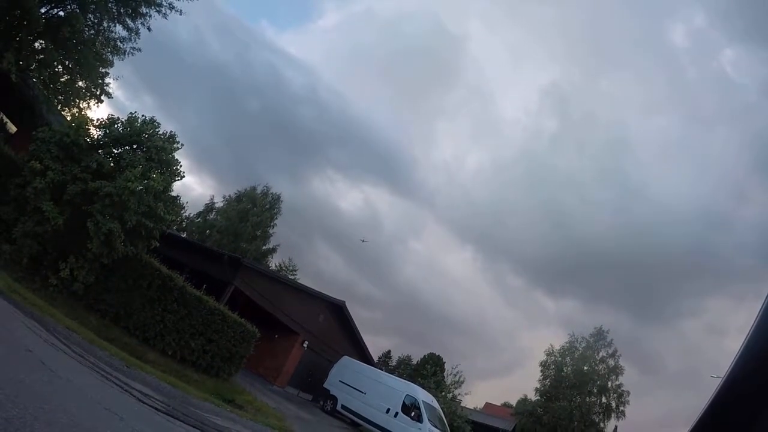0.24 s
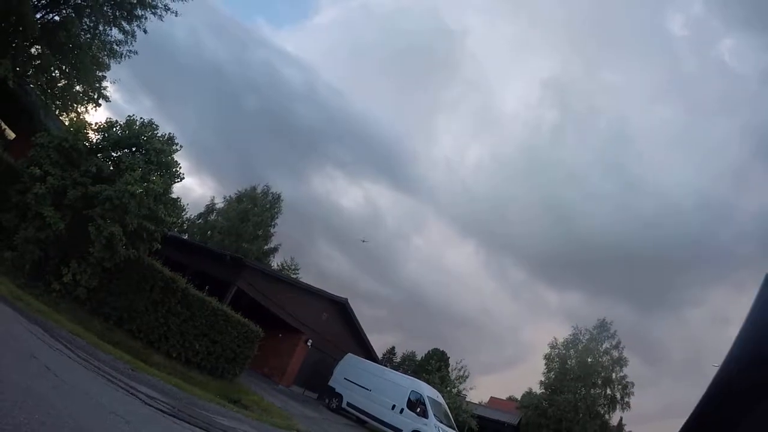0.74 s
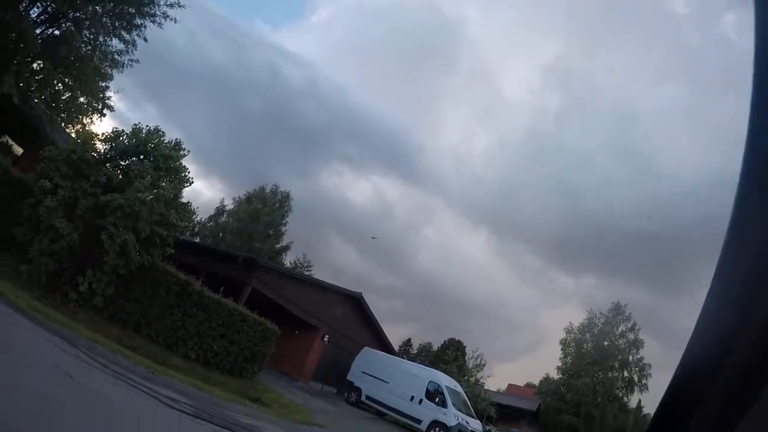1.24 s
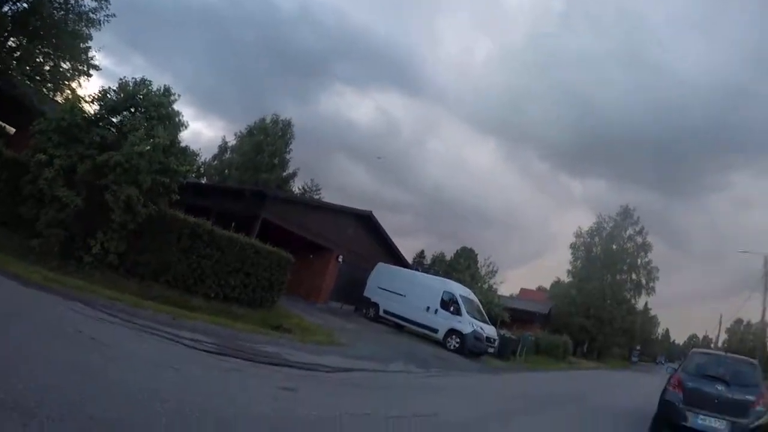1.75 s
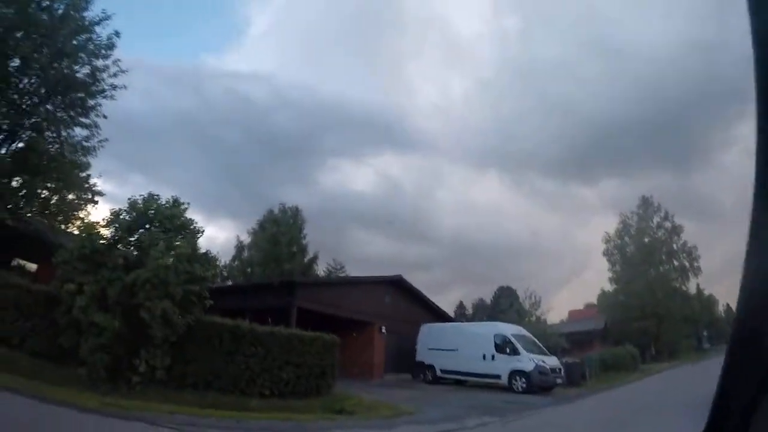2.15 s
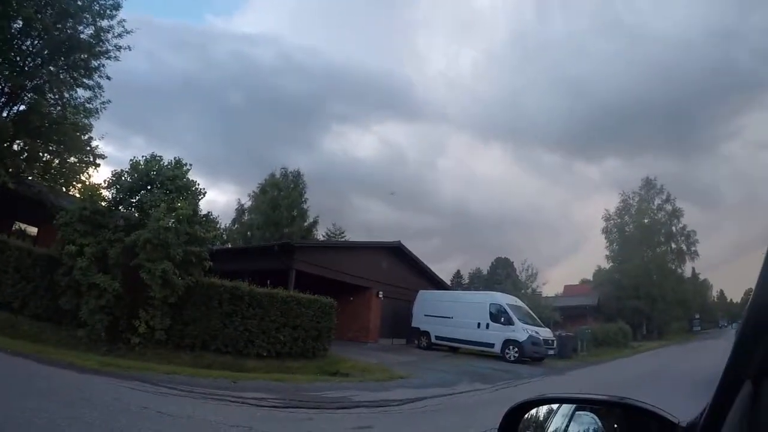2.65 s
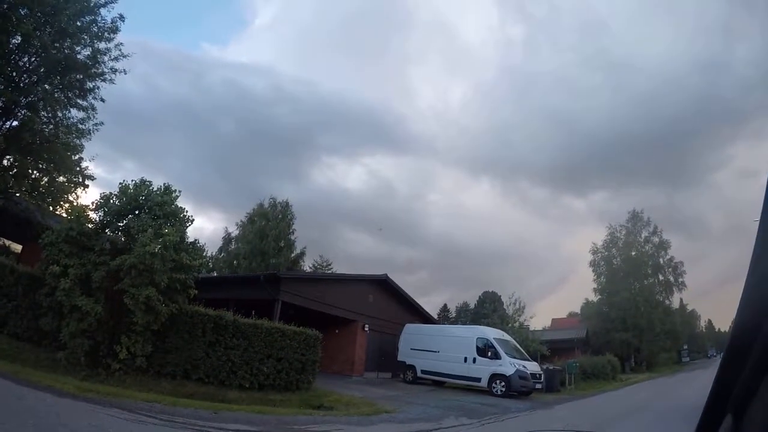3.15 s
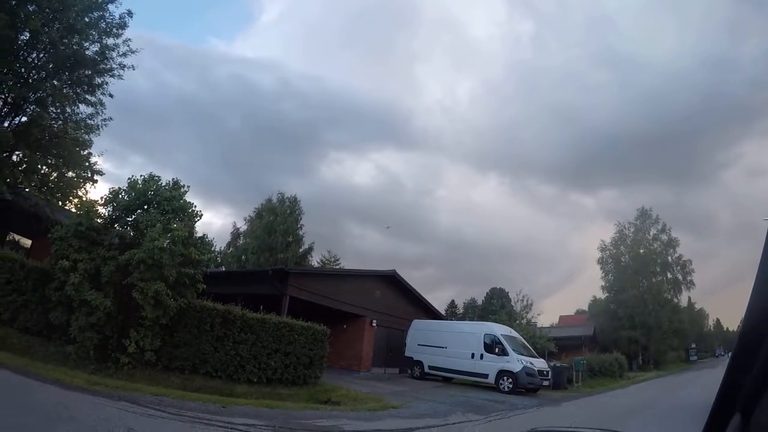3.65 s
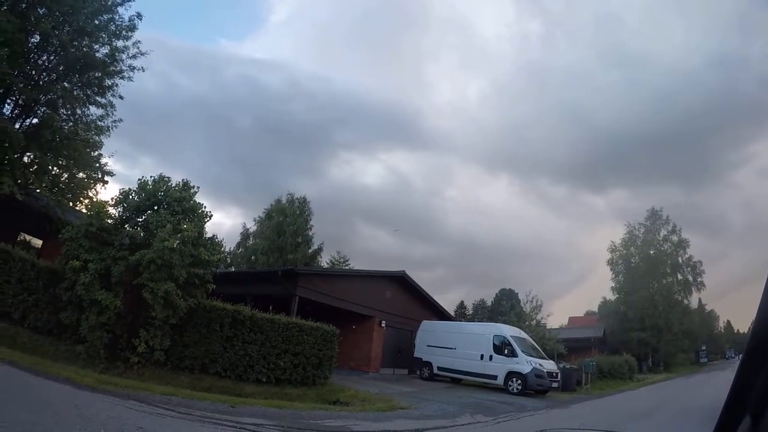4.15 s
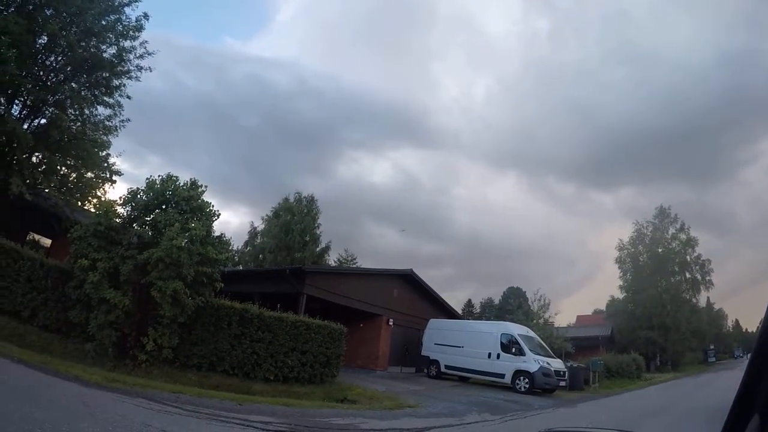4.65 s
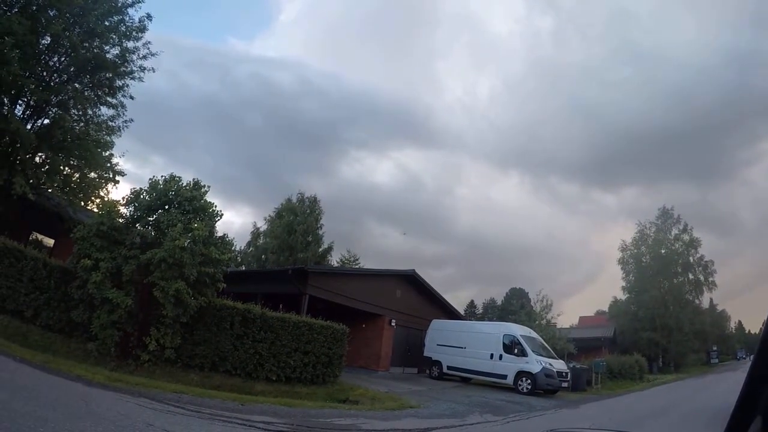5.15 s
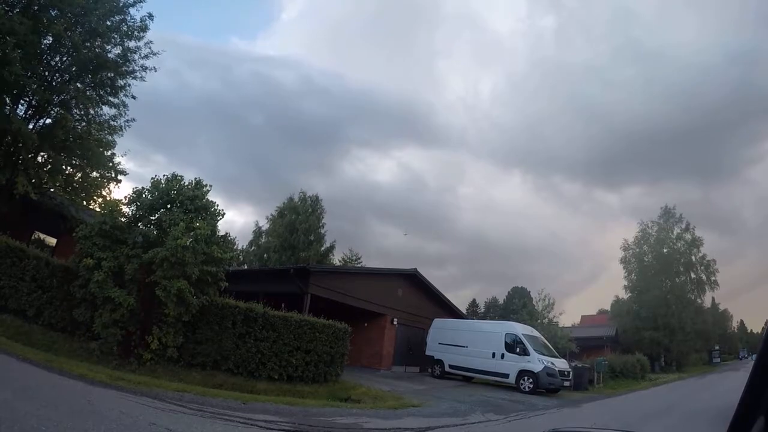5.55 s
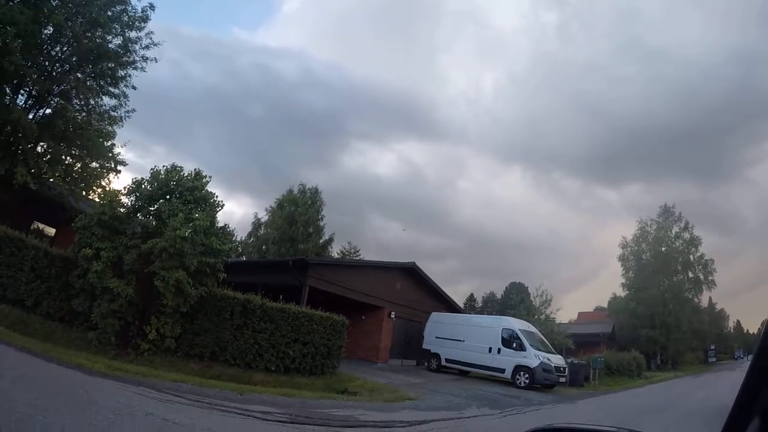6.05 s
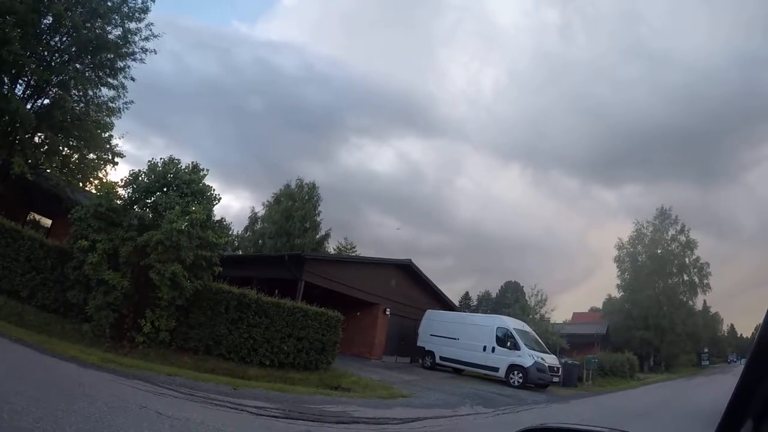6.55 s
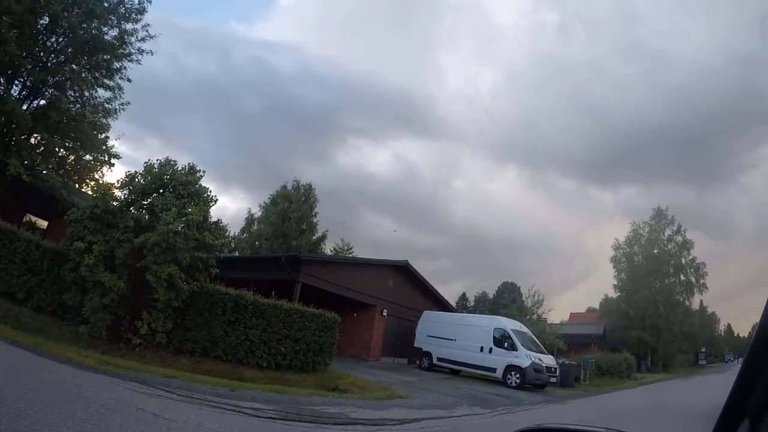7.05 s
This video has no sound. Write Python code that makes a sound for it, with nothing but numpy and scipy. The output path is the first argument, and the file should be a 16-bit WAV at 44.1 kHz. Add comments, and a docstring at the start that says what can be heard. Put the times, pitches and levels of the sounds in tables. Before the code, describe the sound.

Heavy, very low rolling noise dominates, pulsing irregularly in the car body, droning and humming. Over it lies a quiet mid-range roar with a phasey, slowly rising hollow colour and a faint whine that comes and goes. Close stereo microphone in the hand: small ticks and rubbing, then a rough grip slip, a knock, more rubbing, a brief grip creak past four seconds, and a crack with a short thud past six. Slight hiss.

```python
"""In a quiet street, at the side window of a car with worn wheel bearings.
A deep rumble of filtered noise booms in the body, in uneven surges, with a hum and a growl over it.
A softer roar of noise swells above it, coloured by a reflection whose path shortens overall.
The hand-held microphone is turned: noise bursts rustle, resonances tick, the grip squeaks, air puffs.
The recorder limits the bass."""
import sys
import numpy as np
from scipy import signal
from scipy.fft import rfft, irfft
from scipy.io import wavfile
from scipy.ndimage import uniform_filter1d, minimum_filter1d

SR = 44100
rng = np.random.default_rng(int(sys.argv[2]) if len(sys.argv) > 2 else 0)


def store_pcm(level_fs):
    """Save levels as 16-bit WAV."""
    pcm = np.round(np.clip(level_fs, -1, 1) * 32767).astype(np.int16)
    wavfile.write(sys.argv[1], SR, np.atleast_2d(pcm).T)


N = 321706
TIME = np.arange(N) / SR  # s
FREQS = np.maximum(np.arange(N // 2 + 1) * SR / N, 1)  # Hz, kept above zero for the log axis


def from_db(db):
    """Decibels to gain."""
    return 10 ** (np.asarray(db) / 20)


def rms_one(x):
    """Scale to unit power."""
    return x / np.sqrt(np.mean(x ** 2) + 1e-20)


def in_time(rows):
    """Each column of an automation curve at every sample."""
    s, *columns = np.transpose(rows)
    return [np.interp(TIME, s, c) for c in columns]


def over_hz(points):
    """A table read at every frequency, on a log axis."""
    hz, value = np.transpose(points)
    return np.interp(np.log(FREQS), np.log(hz), value)


def noise(spectrum, channels=1):
    """Unrelated noises of one colour, falling steeply past its last point; rms 1."""
    top_hz = spectrum[-1][0]
    gain = from_db(over_hz(spectrum)) * np.minimum(1, top_hz / FREQS) ** 8
    white = rng.standard_normal((channels, N))
    return rms_one(irfft(rfft(white) * gain, N))


def smooth(x, seconds):
    """Triangular running mean."""
    size = max(int(seconds * SR), 1)
    return uniform_filter1d(uniform_filter1d(x, size), size)


def flutter(seconds):
    """Slow random movement with rms 1."""
    return rms_one(smooth(rng.standard_normal(N), seconds))


def steady(x, seconds):
    """Even out the slow swells of a noise."""
    return x / np.sqrt(smooth(x ** 2, seconds) + 1e-9)


def below(x, edge_hz):
    """The part of a sound under a steep crossover."""
    return irfft(rfft(x) / (1 + (FREQS / edge_hz) ** 8), N)


def resonate(x, modes):
    """Parallel resonances (Hz, width Hz, dB) with alternating signs."""
    out = 0
    for k, (hz, width, db) in enumerate(modes):
        r = np.exp(-np.pi * abs(width) / SR)
        poles = [1, -2 * r * np.cos(2 * np.pi * hz / SR), r * r]
        gain = (-1) ** k * from_db(db) * (1 - r * r) / 2
        out = out + gain * signal.lfilter([1, 0, -1], poles, x + 1e-18)
    return out


def delayed(x, ms):
    """A sound late by a fixed or moving delay."""
    return np.interp(TIME - ms / 1000, TIME, x)


def pan(db):
    """Left and right gains for a level difference."""
    return from_db(np.array([[db], [-db]]) / 2)


def swell(at_s, length_s):
    """A bell-shaped rise and fall."""
    return np.exp(-np.minimum(((TIME - at_s) / length_s) ** 2 / 2, 50))


def gesture(at_s, hold_s, attack_s, release_s):
    """Exponential attack, level hold, exponential release."""
    early = np.maximum(at_s - TIME, 0)
    late = np.maximum(TIME - at_s - hold_s, 0)
    return np.exp(-np.minimum(early / attack_s + late / release_s, 50))


def tone(hz):
    """A sine that follows a moving pitch."""
    return np.sin(2 * np.pi * np.cumsum(hz) / SR)


# colour of the microphone hiss: (frequency [Hz], relative density [dB per Hz])
HISS_COLOUR = [(500, 16), (4300, -4.5), (5500, -3.5), (6100, -0.5), (6800, -1.5), (8200, -3.5),
               (9800, -2.5), (11000, -7.5), (12500, -12), (14500, -22)]


def hiss(level_db=-51.5):
    """The microphone's own noise, unrelated at its two ports."""
    return from_db(level_db) * noise(HISS_COLOUR, channels=2)


# cracks of the housing: (time [s], level before trim [dB], decay [s], left over right [dB])
TICK_EVENTS = [(0.773, -54, 0.0027, 5), (0.786, -52, .003, 0), (0.971, -59, .003, -7),
               (2.273, -57.5, 0.012, -4), (2.3316, -60, .006, 2), (3.049, -61, .008, -3),
               (6.2392, -57, .002, -3), (6.279, -42.5, 0.0014, 2), (6.2806, -39, .002, -1)]
# resonances of the plastic housing: (frequency [Hz], width [Hz], level [dB])
HOUSING_MODES = [(1100, 900, 14), (1880, 750, 13), (2770, 900, 0.5), (4600, 1200, -3.5), (5430, 340, -3),
                 (5980, 450, 6), (7650, 520, -4), (9700, 2000, -12.5)]


def ticks(trim_db=14.0):
    """Short cracks, decaying bursts of noise, ring the plastic housing."""
    force = np.zeros((2, N))
    age = TIME[:SR // 20]
    for s, db, decay, pan_db in TICK_EVENTS:
        start = int(s * SR)
        burst = np.exp(-age / decay) * rng.standard_normal((2, len(age)))
        force[:, start:start + len(age)] += from_db(db + trim_db) * pan(pan_db) * burst
    return resonate(force, HOUSING_MODES)


# chirps of the squeaking grip: (time [s], bell width [s], mean pitch [Hz], level [dB])
GRIP_CHIRPS = [(4.346, .008, 3900, -63), (4.362, .007, 5070, -61), (4.377, 0.007, 4730, -62),
               (4.637, .011, 4650, -67), (4.7, .015, 4740, -69)]
# partials of the creak: (multiple of the slip rate, level [dB])
CREAK_PARTIALS = [(6, -67), (7, -61), (8, -59), (9, -65), (13, -66), (15, -69)]


def squeak(creak_at_s=4.396, creak_s=0.021, slip_hz=482, rise_hz_per_s=200,
           waver=.006, waver_s=0.00195, haze_db=-58, pan_db=-4.0):
    """The grip sticks and slips: thin chirps and a creak of rising slip rate, in a haze of friction."""
    from_middle = np.clip(TIME - creak_at_s, -3 * creak_s, 3 * creak_s)
    slips = slip_hz + rise_hz_per_s * from_middle
    unsteady = 1 + waver * flutter(waver_s)
    partials = sum(from_db(db) * tone(k * slips * unsteady) for k, db in CREAK_PARTIALS)
    haze = from_db(haze_db) * noise(RUB_SPECTRUM, channels=2)
    creak = swell(creak_at_s, creak_s) * (partials + haze)
    chirps = sum(from_db(db) * swell(s, length) * tone(hz * unsteady)
                 for s, length, hz, db in GRIP_CHIRPS)
    return (creak + chirps) * pan(pan_db)


# dull knocks: (time [s], bell width [s], pitch [Hz], level [dB])
BODY_KNOCKS = [(2.165, 0.0021, 223, -13), (6.282, 0.00096, 330, -28)]


def bump():
    """Soft, dull knocks on the body of the microphone: sines under a brief bell."""
    return sum(from_db(db) * swell(s, length) * np.sin(2 * np.pi * hz * (TIME - s))
               for s, length, hz, db in BODY_KNOCKS)


# jolts of the grip: (time [s], level [dB], attack and decay [s])
GRIP_JOLTS = [(1.802, -14, .005), (1.849, -15, .011), (6.2805, -10, .016)]


def jolts(pitch_hz=58):
    """A jolt rocks the microphone in its mount: a short, deep thud, opposite at the two ports."""
    side = 0
    for s, db, decay in GRIP_JOLTS:
        age = np.maximum(TIME - s, 0)
        thud = gesture(s, 0, decay, decay) * np.sin(2 * np.pi * pitch_hz * age)
        side = side + from_db(db) * thud
    return np.array([side, -side])


# puffs on the ports: (time [s], bell width [s], level [dB], centre [Hz], width [Hz])
AIR_PUFFS = [(0.782, 0.011, -32, 550, 550), (1.738, 0.018, -31, 880, 400), (1.828, 0.013, -21, 950, 280),
             (2.165, 0.0085, -29, 258, 261), (2.259, 0.015, -30, 550, 550), (6.284, 0.0017, -27, 900, 800)]
# colour of the moving air: (frequency [Hz], relative density [dB per Hz])
AIR_COLOUR = [(100, 2), (220, 12), (1000, -6), (1500, -8), (2200, -12)]


def puffs(stroke_db=12.0, stroke_hz=300):
    """Air buffets the moving microphone, also under each stroke, in opposite senses at its ports."""
    air = noise(AIR_COLOUR)[0]
    side = from_db(stroke_db) * hand_pressure() * rms_one(resonate(air, [(stroke_hz, stroke_hz, 0)]))
    for s, length, db, hz, width in AIR_PUFFS:
        side = side + from_db(db) * swell(s, length) * rms_one(resonate(air, [(hz, width, 0)]))
    return np.array([side, -side])


# strokes of the hand: (start [s], hold [s], level [dB], thin rustle against that level [dB])
HAND_STROKES = [(0.778, .02, -56, -14), (0.97, .015, -55.5, -18), (1.07, .065, -64.5, 0),
                (1.41, 0.19, -57, -8.5), (1.665, 0.076, -55.5, -8), (1.73, 0.015, -48, -18),
                (1.887, 0.077, -56.5, -11), (2.336, .025, -53, -11), (2.445, 0.12, -62, -4)]
STROKE_ATTACK_S, STROKE_RELEASE_S = 0.024, 0.042  # time constants of every stroke


def hand_pressure():
    """All strokes of the hand over the housing as one gain."""
    return sum(from_db(db) * gesture(s, hold, STROKE_ATTACK_S, STROKE_RELEASE_S)
               for s, hold, db, _ in HAND_STROKES)


# colour of the rubbing: (frequency [Hz], relative density [dB per Hz])
RUB_SPECTRUM = [(800, -11), (1800, 8.5), (3000, -9), (4400, -1), (5200, -2.5), (6100, -3), (7800, -6.5),
                (10000, -13), (13000, -26)]
# colour of the slip: (frequency [Hz], relative density [dB per Hz])
SCUFF_SPECTRUM = [(400, 11), (1150, -11), (1550, 8), (1900, 7.5), (2900, -1), (3500, -2.5), (3900, 2.5),
                  (4400, -5.5), (6100, -0.5), (7800, -16.5), (10300, -15), (13500, -30)]
# the grip slips once
SCUFF_AT_S, SCUFF_HOLD_S, SCUFF_DB = 1.8135, 0.024, -28.7
SCUFF_ATTACK_S, SCUFF_RELEASE_S = 0.0095, 0.008
RUSTLE_HZ, RUSTLE_WIDTH_HZ = 5860, 990  # band of the thin rustle


def handling(grain_db=2.0, brush_db=0.9, brush_s=0.013, scuff_grain_db=2.0, slip_s=0.00098,
             body_lag_ms=4.4, body_hz=2800, width=.85):
    """Skin drags in tiny slips, partly unlike at each port; the hard scuff's body trails its hiss."""
    band = [(RUSTLE_HZ, RUSTLE_WIDTH_HZ, 0)]
    lightness = sum(from_db(db + rustle_db) * gesture(s, hold, STROKE_ATTACK_S, STROKE_RELEASE_S)
                    for s, hold, db, rustle_db in HAND_STROKES)
    white = rng.standard_normal((2, N))
    rustle = lightness * rms_one(resonate(resonate(white, band), band))
    drag = hand_pressure() * noise(RUB_SPECTRUM, channels=2)
    grain = from_db(grain_db * flutter(0.0016) + brush_db * flutter(brush_s))
    rub = (drag + rustle) * grain

    slip = gesture(SCUFF_AT_S, SCUFF_HOLD_S, SCUFF_ATTACK_S, SCUFF_RELEASE_S)
    scuff = from_db(SCUFF_DB) * slip * noise(SCUFF_SPECTRUM, channels=2)
    body = below(scuff, body_hz)
    late_body = np.array([delayed(port, body_lag_ms) for port in body])
    scuff = scuff - body + late_body
    mid, side = rub + scuff * from_db(scuff_grain_db * flutter(slip_s))
    return np.array([mid + width * side, mid - width * side])


# whine against the roar: (time [s], level [dB])
WHINE_CURVE = [(0, -34), (.85, -6.5), (1.4, -33), (2.1, -11.5), (2.5, -26.5), (3.05, -11), (3.7, -24),
               (5.2, -18.5), (7.25, -18)]


def whine(pitch_hz=1630, width_hz=45):
    """A narrow resonance, excited by noise, sings faintly in the rush, coming and going."""
    mode = [(pitch_hz, width_hz, 0)]
    level = in_time(ROAR_CURVE)[0] + in_time(WHINE_CURVE)[0]
    return from_db(level) * rms_one(resonate(resonate(rng.standard_normal(N), mode), mode))


# hollow ring against the roar: (time [s], level [dB])
HOLLOW_CURVE = [(0, -13), (1.05, -11), (1.4, -9), (2.1, -7.5), (2.45, -26), (3.1, -14.5), (4.2, -26),
                (7.25, -39)]


def hollow(ring_s=0.0036, order=3):
    """The third tooth of the reflection's comb stands out of the rush, glides up overall and fades."""
    hz = order * 1000 / in_time(REFLECTION_PATH)[0]
    level = in_time(ROAR_CURVE)[0] + in_time(HOLLOW_CURVE)[0]
    phase = 2 * np.pi * np.cumsum(hz) / SR
    ring = flutter(ring_s) * np.cos(phase) + flutter(ring_s) * np.sin(phase)
    return from_db(level) * rms_one(ring)


# force of the roar, before trims: (time [s], level [dB])
ROAR_CURVE = [(0, -36), (0.3, -41), (0.63, -43), (0.93, -41), (1.15, -43), (1.45, -36), (2.05, -37.5),
              (2.45, -40), (2.82, -40.5), (3.02, -35), (3.4, -36.5), (3.69, -36.5), (3.92, -40),
              (4.55, -42.3), (4.9, -40.3), (5.25, -40), (5.5, -41), (5.9, -45), (7.25, -44)]
# upper part of the roar against the lower, before trims: (time [s], level [dB])
BRIGHTNESS_CURVE = [(0, -7.5), (1.1, -7.5), (1.45, -12.5), (2.0, -10.5), (2.7, -11), (2.9, -9.5),
                    (3.1, -7.5), (3.7, -11.5), (5.3, -9.5), (7.25, -11.5)]
# colour of the roar: (frequency [Hz], relative density [dB per Hz])
ROAR_COLOUR = [(150, -2), (330, -1.5), (430, 5.5), (540, 1), (720, 0.5), (930, -3.5), (1250, -3.5),
               (1480, -8), (1720, -9), (2000, -14), (2700, -20), (3300, -22.5), (4400, -33.5),
               (8000, -62.5)]
# moving reflection: (time [s], delay [ms], strength [0-1])
REFLECTION_PATH = [(0, 3.37, .5), (1.0, 3.26, 0.5), (1.55, 3.23, 0.8), (1.85, 3.34, 0.4),
                   (2.15, 3.02, 0.48), (3, 2.95, 0.62), (3.6, 2.78, 0.51), (5, 2.64, 0.4),
                   (7.2, 2.43, 0.42)]
# fixed reflections off the door and mirror: (delay [ms], strength [0-1])
DOOR_MIRROR_ECHOES = [(1.23, .1), (1.8, .13)]
# left-right likeness of the roar, limited in use: (frequency [Hz], likeness [up to 1])
ROAR_LIKENESS = [(200, 0.59), (450, 0.84), (700, 0.6), (1100, 0.41), (1600, 0.48), (2400, 0.4), (3300, 1),
                 (5000, .5)]
REFLECTION_DULL_HZ, REFLECTION_TREBLE = 1680, 0.36  # above this only a share comes back


def roar(low_db=0.15, high_db=-0.5, split_hz=1350, flutter_db=0.83, pan_db=-0.7):
    """A wide rush meets its reflections; the moving one, a little dull, sweeps a comb upwards overall."""
    level, = in_time(ROAR_CURVE)
    upper = level + in_time(BRIGHTNESS_CURVE)[0]
    delay_ms, strength = in_time(REFLECTION_PATH)
    direct, diffuse = noise(ROAR_COLOUR, channels=2)
    dull = below(direct, REFLECTION_DULL_HZ)
    dulled = REFLECTION_TREBLE * direct + (1 - REFLECTION_TREBLE) * dull
    moving = np.clip(strength, 0, 1) * delayed(dulled, delay_ms)
    near = sum(g * delayed(direct, ms) for ms, g in DOOR_MIRROR_ECHOES)
    heard = direct + moving + near

    # the side part grows where the two channels are less alike
    alike = np.clip(over_hz(ROAR_LIKENESS), -.9, .99)
    spread = irfft(rfft(diffuse) * np.sqrt((1 - alike) / (1 + alike)), N)
    both = np.array([heard, spread])
    low = below(both, split_hz)
    high = both - low
    low = low / np.std(low[0]) * from_db(level + low_db)
    high = high / np.std(high[0]) * from_db(upper + high_db)
    mid, side = low + high
    return np.array([mid + side, mid - side]) * from_db(flutter_db * flutter(0.02)) * pan(pan_db)


# surges of the body boom, before trim: (time [s], level [dB])
BOOM_CURVE = [(0, -10), (.54, -13), (.72, -11), (.84, -19), (1.0, -8.5), (1.11, -20.5), (1.21, -6),
              (1.33, -20.5), (1.48, -9.5), (1.78, -10.5), (2.03, -14.5), (2.5, -14), (2.63, -11.5),
              (2.78, -17), (3.0, -12), (3.8, -12), (4.1, -7), (4.72, -16.5), (4.91, -8.5), (5.12, -12),
              (5.29, -20.5), (5.5, -9.5), (5.8, -19), (6.2, -11), (6.37, -9), (6.6, -15.5), (7.05, -17),
              (7.25, -19)]
# drone, before trim: (time [s], level [dB])
DRONE_CURVE = [(0, -21.5), (0.33, -27), (0.52, -19.5), (1.17, -21), (2.06, -17.5), (2.7, -19), (3.35, -20),
               (3.6, -18), (4.35, -19.5), (4.9, -21), (5.5, -21), (6.2, -19), (6.4, -20), (7.1, -20.5),
               (7.27, -17.5)]
# hum of the bearings: (time [s], level [dB])
HUM_CURVE = [(0, -41), (.24, -25.5), (.5, -39.5), (.75, -25.5), (1.15, -32.5), (1.5, -28), (1.8, -33),
             (2.1, -28.5), (2.6, -34.5), (2.9, -25.5), (3.15, -30.5), (3.8, -26), (4.4, -32.5), (4.8, -30),
             (5.35, -28), (5.55, -34.5), (6.8, -34), (7.25, -28.5)]
# growl above the drone: (time [s], level [dB])
GROWL_CURVE = [(0, -34), (0.3, -37.5), (1.2, -37), (1.6, -34), (2.15, -36.5), (2.6, -42.5), (3.4, -36),
               (4.2, -41.5), (5.3, -42), (5.8, -45), (6.5, -48), (7.25, -38.5)]
# colours of boom, drone, hum and growl: (frequency [Hz], relative density [dB per Hz])
BOOM_COLOUR = [(3, -55), (10, -25.5), (17, -6.5), (23, 0), (30, 5.5), (37, 15), (43.5, 17), (49, 13),
               (58, 3), (72, -20), (100, -61.5)]
DRONE_COLOUR = [(45, -9), (62, -3.5), (73, 1.5), (83, -2.5), (97, 2.5), (116, -0.5), (143, -11.5),
                (184, -17), (210, -28.5), (300, -53)]
HUM_COLOUR = [(130, -19.5), (152, -3.5), (181, -1.5), (194, -9), (208, -25)]
GROWL_COLOUR = [(170, -28), (212, -4.5), (245, 1.5), (282, -2), (320, -19), (480, -49)]


def rumble(boom_db=-1.5, drone_db=3.5, boom_even_s=0.078, even_s=0.11, pan_db=-1.86, growl_pan_db=1.5):
    """Rough rolling shakes the body: a surging boom, a broader drone, the bearings' hum and a growl."""
    boom = from_db(in_time(BOOM_CURVE)[0] + boom_db) * steady(noise(BOOM_COLOUR), boom_even_s)
    drone = from_db(in_time(DRONE_CURVE)[0] + drone_db) * steady(noise(DRONE_COLOUR), even_s)
    hum = from_db(in_time(HUM_CURVE)[0]) * steady(noise(HUM_COLOUR), even_s)
    growl = from_db(in_time(GROWL_CURVE)[0]) * steady(noise(GROWL_COLOUR), even_s)
    return (boom + drone) * pan(pan_db) + hum + growl * pan(growl_pan_db)


def scene():
    """All sources at the two ports."""
    microphone = hiss() + ticks() + squeak() + bump() + jolts() + puffs() + handling()
    car = whine() + hollow() + roar() + rumble()
    return microphone + car


def limit_bass(x, hold_s=0.015, crossover_hz=330, ceiling_db=-6.2):
    """A fast look-ahead limiter holds down the peaks of the bass and leaves the treble alone."""
    bass = below(x, crossover_hz)
    allowed = np.minimum(1, from_db(ceiling_db) / (np.abs(bass.mean(axis=0)) + 1e-9))
    held = minimum_filter1d(allowed, max(int(hold_s * SR), 1))
    gain = smooth(held, hold_s / 2)
    return x + (gain - 1) * bass


CUTOFF_HZ = 14500


def record(dry):
    """The bass is limited, the deepest bass is cut, the ends are eased and the top is cut."""
    ends = np.minimum(1, np.minimum(TIME, TIME[::-1]) / .003)  # 3 ms fades
    limited = limit_bass(dry)
    limited = limited - below(limited, 6)
    top_cut = signal.butter(14, CUTOFF_HZ, fs=SR, output="sos")
    return signal.sosfilt(top_cut, ends * limited)


dry = scene()
out = record(dry)
store_pcm(out)
```